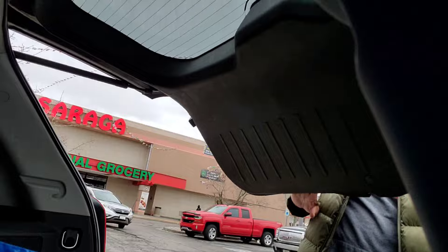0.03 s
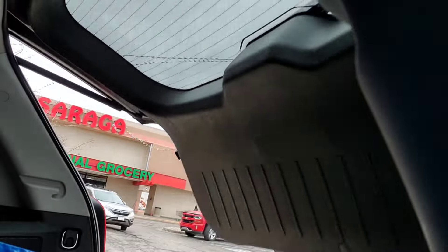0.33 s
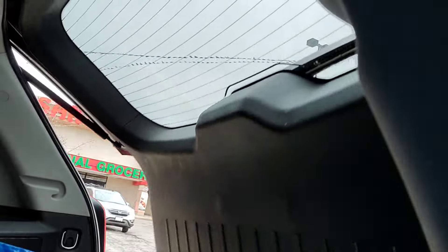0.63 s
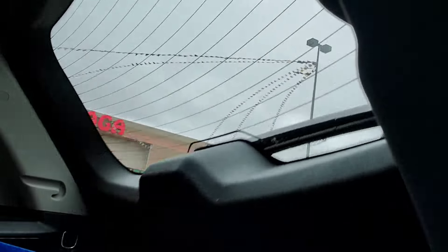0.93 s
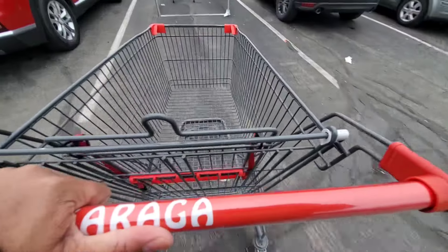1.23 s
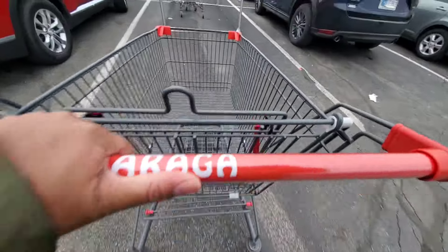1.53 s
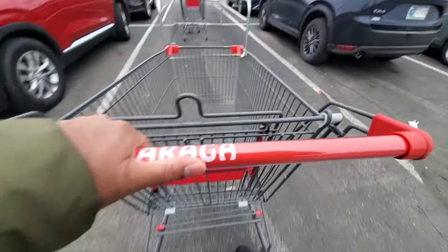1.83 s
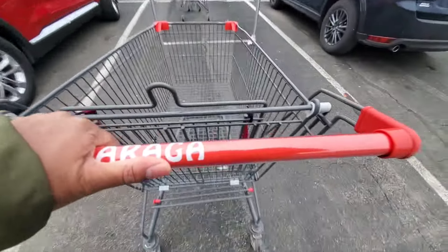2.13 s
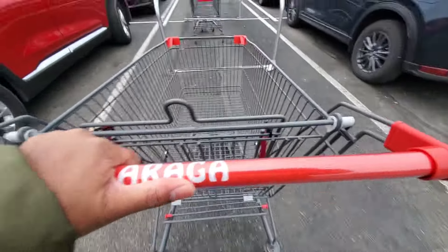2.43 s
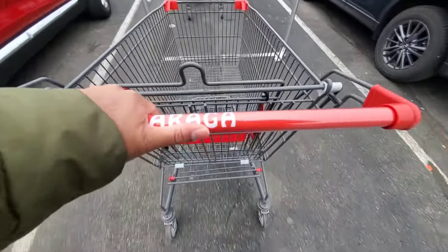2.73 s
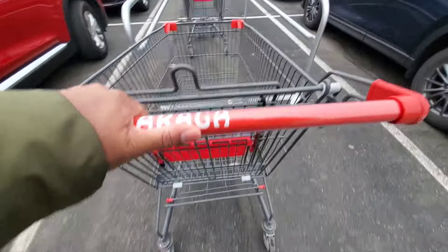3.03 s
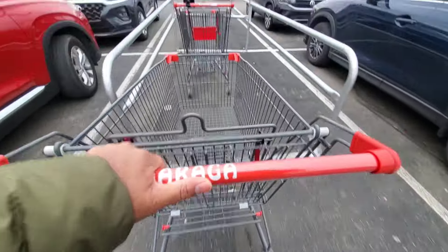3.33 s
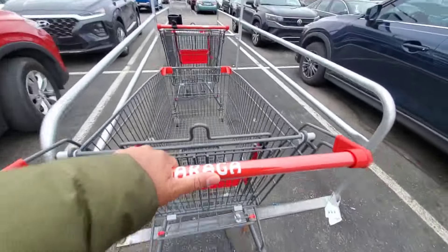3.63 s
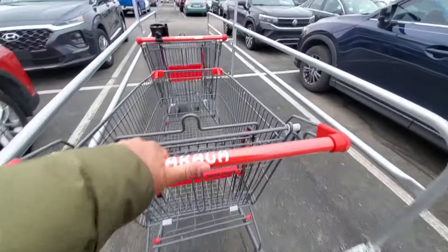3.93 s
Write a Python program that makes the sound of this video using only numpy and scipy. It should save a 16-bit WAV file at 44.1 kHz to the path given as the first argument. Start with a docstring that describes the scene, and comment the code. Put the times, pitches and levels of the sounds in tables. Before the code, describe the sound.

A metal shopping cart clatters across rough asphalt, following a tailgate's soft closing.

```python
"""A low rumble and the swish of a padded jacket, heard from inside a car's boot; the tailgate swings down
with a soft whine and light ticks, and the narrowing gap shuts out the car park. After a short silence
a wire shopping cart is pushed over rough asphalt. The ground forces the wheels to drum, and impacts
at loose joints excite the modes of frame and basket, which chatter and ring. Now and then a wheel
drops into a crack and the whole cart clanks."""
import sys
import numpy as np
from scipy import signal
from scipy.fft import rfft, irfft
from scipy.io import wavfile
from scipy.ndimage import uniform_filter1d

SR = 44100
rng = np.random.default_rng(int(sys.argv[2]) if len(sys.argv) > 2 else 0)


def output_pcm(signal):
    """Save a mono or channel-first signal as 16-bit PCM at the path in sys.argv[1].

    Samples are clipped to [-1, 1] before scaling.
    """
    pcm = np.clip(np.atleast_2d(signal).T, -1, 1) * 32767
    wavfile.write(sys.argv[1], SR, np.round(pcm).astype(np.int16))


N = 176400
TIME = np.arange(N) / SR
SIDES = np.array([[1], [-1]])  # a pan in dB is added on the left and subtracted on the right


def from_db(db):
    """Amplitude ratio of a level in decibels."""
    return 10 ** (np.asarray(db) / 20)


def unit_rms(x):
    """Normalisation to an rms of 1."""
    return x / np.sqrt(np.mean(x ** 2) + 1e-20)


def in_time(rows):
    """Linear interpolation of a table at every sample."""
    return np.interp(TIME, *np.transpose(rows))


def at_hz(rows, hz, column=1):
    """Interpolation of one column on a log-frequency axis."""
    rows = np.array(rows)
    return np.interp(np.log(hz), np.log(rows[:, 0]), rows[:, column])


def bins(size):
    """Frequencies of a discrete spectrum, floored at 1 Hz."""
    return np.maximum(np.arange(size // 2 + 1) * SR / size, 1)


def drift(hz):
    """Random fluctuation: low-passed noise of rms 1."""
    return unit_rms(irfft(rfft(rng.standard_normal(N)) / (1 + (bins(N) / hz) ** 2), N))


def noise(db, correlation=0, size=N):
    """Shaped stereo noise of rms 1; the ratio of mid to side sets the left-right correlation."""
    mid, side = rfft(rng.standard_normal((2, size)))
    correlation = np.clip(correlation, -.99, .99)
    spectrum = np.sqrt(1 + correlation) * mid + np.sqrt(1 - correlation) * side * SIDES
    return unit_rms(irfft(from_db(db) * spectrum, size))


def resonator(impulses, hz, t60):
    """Damped oscillator: a unit impulse starts a decaying sine of amplitude 1."""
    r, w = from_db(-60 / (t60 * SR)), 2 * np.pi * hz / SR
    return signal.lfilter([0, np.sin(w)], [1, -2 * r * np.cos(w), r * r], impulses + 1e-18)


# spectra of the rumble and the outdoor wash: (frequency [Hz], relative level [dB])
RUMBLE_SPECTRUM = [(15, -14), (30, 4), (42, -10), (58, 3.5), (78, -2.5), (100, -1), (135, -19),
                   (200, -20.5), (900, -50), (8000, -91)]
WASH_SPECTRUM = [(250, -7), (650, 2), (1000, -1.5), (1500, -1.5), (3000, -10.5), (6000, -18.5), (9000, -27),
                 (15000, -22.5)]
# envelope of the wash before its treble is shut out: (time [s], level [dB])
WASH_ENVELOPE = [(0, -40), (.3, -38.5), (.6, -40), (.8, -41), (1.17, -48)]
# left-right likeness of both: (frequency [Hz], correlation [-1 to 1])
CAR_CORRELATION = [(60, 1), (180, 0.94), (550, 0.64), (1650, -0.32), (5000, 0.16)]


def car_park(rumble_db=-29, seal_start_s=0.98, seal_hz=3470, seal_db_per_s=34, wash_pan_db=3.5):
    """Transmission through a closing gap: the wash fades, treble fastest, over a steady rumble."""
    hz = bins(N)
    correlation = at_hz(CAR_CORRELATION, hz)
    rumble = from_db(rumble_db + .4 * SIDES) * noise(at_hz(RUMBLE_SPECTRUM, hz), correlation)
    wash = noise(at_hz(WASH_SPECTRUM, hz), correlation)
    muffled = irfft(rfft(wash) / (1 + (hz / seal_hz) ** 2), N)
    gap = from_db(-seal_db_per_s * np.maximum(TIME - seal_start_s, 0))
    transmitted = muffled + gap * (wash - muffled)
    return rumble + from_db(in_time(WASH_ENVELOPE) + wash_pan_db * SIDES) * transmitted


def tailgate_whine(hz=750, db=-49.5, start_s=0.834, rise_s=.03, pan_db=6, waver=0.003):
    """Random modulation: a faint tone wavers in pitch and level as the tailgate ends its travel."""
    phase = 2 * np.pi * np.cumsum(hz * (1 + waver * drift(26))) / SR
    swell = np.clip((TIME - start_s) / rise_s, 0, 1)
    return np.sqrt(2) * np.sin(phase) * swell * from_db(db + pan_db * SIDES + 2.0 * drift(13))


# ticks of the tailgate's trim: (time [s], level [dB])
TRIM_TICKS = [(.090, -33), (.885, -34.5), (.906, -22), (.917, -25.5)]
# their spectrum: (frequency [Hz], relative level [dB])
TICK_SPECTRUM = [(800, -9), (2300, -4.5), (3850, 6), (4800, -5), (8000, -11), (10500, 0), (15000, -1)]


def trim_ticks(t60_s=0.042):
    """Damped transients: each tick of the plastic trim is noise that decays exponentially."""
    envelope = sum((TIME >= s) * from_db(db - 60 * np.abs(TIME - s) / t60_s) for s, db in TRIM_TICKS)
    return envelope * noise(at_hz(TICK_SPECTRUM, bins(N)))


# strokes of the jacket: (peak time [s], rise [s], fall [s], level [dB], tilt [dB/octave])
STROKES = [(.03, 0.11, 0.086, -38, -1), (.362, 0.053, 0.05, -30, .8), (.455, 0.037, 0.033, -33, 0.5),
           (0.558, 0.019, 0.03, -34, -2.5), (0.606, 0.003, 0.026, -31.5, 0), (.69, 0.05, .036, -37, .6),
           (0.916, 0.013, 0.021, -36.5, 3)]
# spectrum of sliding nylon: (frequency [Hz], relative level [dB])
NYLON_SPECTRUM = [(300, -19), (700, -4), (1500, 0.5), (3000, 2), (4300, -5), (6600, -3), (8000, -12.5),
                  (12000, -8), (15500, -9)]


def jacket(pan_db=0.5, pan_db_per_octave=-2, grain_db=1.3):
    """Friction noise: nylon slides on nylon in soft, slightly grainy swells."""
    out, hz = 0, bins(N)
    octaves = np.log2(np.maximum(hz, 500) / 4000)
    spectrum = at_hz(NYLON_SPECTRUM, hz) + SIDES * (pan_db + pan_db_per_octave * octaves)
    for s, rise, fall, db, tilt in STROKES:
        width = np.where(TIME < s, rise, fall)
        swell_db = -4.04 * ((TIME - s) / width) ** 2  # Gaussian envelope
        out = out + from_db(db + swell_db) * noise(spectrum + tilt * octaves)
    return out * from_db(grain_db * drift(90))


# envelope of the wheels' drumming: (time [s], relative level [dB])
DRUM_ENVELOPE = [(1.28, -30), (1.5, -32), (1.58, -37), (1.9, -37), (2.1, -33), (2.3, -36), (3.2, -34.5),
                 (3.5, -39), (3.99, -39.5)]
# spectra of the drumming and the grinding treads: (frequency [Hz], relative level [dB])
DRUM_SPECTRUM = [(20, -19), (40, -4.5), (70, 2.5), (110, -2.5), (160, -9), (230, -20.5), (450, -35)]
TREAD_SPECTRUM = [(100, -8.5), (280, 1.5), (450, -10), (750, -3.5), (1100, -12.5), (2500, -36)]
# left-right likeness of the cart: (frequency [Hz], correlation [0 to 1])
CART_CORRELATION = [(60, 0.13), (120, 0.33), (240, 0.99), (480, 0.78), (950, 0.41), (1900, 0.0041)]


def wheels(drum_gain_db=3.0, tread_db=-36.5, pan_db=1.5, flutter_db=1.7):
    """Roughness excitation: hard wheels drum unevenly on asphalt while their treads grind on grit."""
    hz = bins(N)
    correlation = at_hz(CART_CORRELATION, hz)
    drum = noise(at_hz(DRUM_SPECTRUM, hz), correlation) * from_db(in_time(DRUM_ENVELOPE) + drum_gain_db)
    grind = noise(at_hz(TREAD_SPECTRUM, hz), correlation) * from_db(tread_db)
    return (drum + grind) * from_db(pan_db * SIDES + flutter_db * drift(15))


# a wheel drops into a dip: (time [s], left level [dB])
DIPS = [(1.345, -20), (1.394, -20), (1.491, -16), (2.066, -17), (2.736, -15), (2.909, -19), (3.18, -19)]


def frame_booms(left_hz=89.5, t60_s=0.11):
    """Impulse response: each dip makes the frame boom briefly, lower and softer on the right."""
    impulses = np.zeros(N)
    for s, db in DIPS:
        impulses[int(s * SR)] = from_db(db)
    left = resonator(impulses, left_hz, t60_s)
    right = 0.34 * resonator(impulses, 0.67 * left_hz, t60_s)
    return np.array([left, right])


# resonances of the cart: (frequency [Hz], left gain [dB], right gain [dB])
BASKET_RESPONSE = [(285, -8, -11), (417, -15, -16), (790, -12.5, -12.5), (926, -16.5, -16), (1384, -5, -7),
                   (1790, -7, -11), (2490, -2, -1), (2980, -8.5, -2.5), (3140, -6.5, -12), (4020, -8, -1.5),
                   (4780, -16, -6.5), (5140, -7, -2.5), (6960, -13, -9), (7500, -23.5, -12),
                   (10030, -23, -16.5), (11460, -15.5, -6.5), (13050, -23.5, -17.5), (14100, -20.5, -13.5),
                   (15560, -9, -25)]


def basket_db(hz):
    """Frequency response of the cart on each side, with a bass roll-off below 480 Hz."""
    response = np.array([at_hz(BASKET_RESPONSE, hz, column) for column in (1, 2)])
    return response - 10 * np.log10(1 + (480 / hz) ** 4)


def contacts(per_s):
    """Poisson process: metal touches metal at random times, with slightly uneven strength."""
    strengths = from_db(-0.5 * np.minimum(rng.exponential(1, N), 3.2))
    return (rng.random(N) < per_s / SR) * strengths * rng.choice([-1, 1], N)


def loose_joints(shake, hits_per_s, band_hz, joints=6, mode_spacing_hz=59.95):
    """Convolution: every contact gives a short crack and a ring of that joint's own scattered modes."""
    crack_t60_s, ring_t60_s, ring_gain_db = 0.017, 0.23, 2
    size = SR // 3
    out, hz, t = 0, bins(size), TIME[:size]
    low_hz, high_hz = band_hz
    spectrum = basket_db(hz) - 10 * np.log10((1 + (low_hz / hz) ** 16) * (1 + (hz / high_hz) ** 16))
    correlation = at_hz(CART_CORRELATION, hz)
    for _ in range(joints):
        is_mode = (rng.random(len(hz)) < SR / size / mode_spacing_hz) & (hz > 1100)
        modes_db = np.where(is_mode, rng.uniform(-3, 3, (2, len(hz))), -80)
        crack = unit_rms(noise(spectrum, correlation, size) * from_db(-60 * t / crack_t60_s))
        ring = unit_rms(noise(spectrum + modes_db, correlation, size) * from_db(-60 * t / ring_t60_s))
        response = crack + from_db(ring_gain_db) * ring
        out = out + signal.fftconvolve(contacts(hits_per_s / joints)[None], response, axes=1)[:, :N]
    running_rms = np.sqrt(uniform_filter1d(np.mean(out ** 2, axis=0), size=SR // 25) + 1e-9)
    return out / running_rms * from_db(in_time(shake))


# how hard each part of the cart is shaken: (time [s], relative level [dB])
FRAME_ENVELOPE = [(1.28, -24), (1.38, -27), (1.64, -25.5), (1.67, -22.5), (1.71, -27), (1.76, -25),
                  (1.94, -25), (2.05, -27), (2.09, -24), (2.19, -27.5), (2.4, -25.5), (2.78, -24),
                  (2.98, -24), (3.17, -27.5), (3.23, -23), (3.3, -27.5), (3.36, -23), (3.58, -28.5),
                  (3.59, -24.5), (3.87, -24.5), (3.99, -28)]
WIRE_ENVELOPE = [(1.28, -25.5), (1.43, -29.5), (1.65, -25.5), (1.67, -22.5), (1.9, -23), (2.09, -26),
                 (2.15, -28), (2.48, -23), (2.52, -25.5), (2.94, -23), (3.13, -27), (3.25, -23.5),
                 (3.4, -23.5), (3.58, -26.5), (3.59, -22), (3.82, -24.5), (3.87, -22), (3.99, -27.5)]
JINGLE_ENVELOPE = [(1.28, -27.5), (1.4, -33), (1.7, -28), (1.87, -26.5), (1.95, -23), (1.98, -28.5),
                   (2.2, -31), (2.25, -28), (2.37, -30), (2.49, -25.5), (2.55, -29), (2.95, -26),
                   (3.1, -30), (3.38, -24), (3.45, -31), (3.52, -26), (3.6, -31), (3.63, -26), (3.87, -25),
                   (3.95, -29.5)]


def chatter(flicker_db=0.5, flicker_hz=23.5):
    """Base excitation: the ground jostles heavy bars, thinner wires and the finest jingling parts."""
    frame = from_db(2.5) * loose_joints(FRAME_ENVELOPE, hits_per_s=420, band_hz=(220, 3240))
    wires = from_db(3) * loose_joints(WIRE_ENVELOPE, hits_per_s=600, band_hz=(3040, 7350))
    jingle = from_db(4) * loose_joints(JINGLE_ENVELOPE, hits_per_s=650, band_hz=(8360, 16900))
    return (frame + wires + jingle) * from_db(flicker_db * drift(flicker_hz))


def pings(per_s=240, gain_db=4, t60_s=0.073, spread_db=5, tilt_db_per_octave=2.6):
    """Free vibration: wires flick against each other, each ringing briefly at its natural frequency."""
    size = SR // 8
    out, t = np.zeros((2, N + size)), TIME[:size]
    shakes = np.array([in_time(FRAME_ENVELOPE), in_time(WIRE_ENVELOPE), in_time(JINGLE_ENVELOPE)])
    decay = from_db(-60 * t / t60_s)
    starts = np.flatnonzero(rng.random(N) < per_s / SR)
    for start, (pitch, strength, *phases) in zip(starts, rng.random((N, 4))[starts]):
        hz = 1250 * 10 ** pitch
        part = np.searchsorted([3200, 8000], hz)  # frame, wire or jingle band
        colour_db = basket_db(hz) + tilt_db_per_octave * np.log2(hz / 2500)
        db = shakes[part, start] + gain_db + colour_db + spread_db * (2 * strength - 1)
        tone = np.sin(2 * np.pi * (hz * t + np.array(phases)[:, None]))
        out[:, start:start + size] += from_db(db)[:, None] * decay * tone
    return out[:, :N]


# wires that ring out clearly: (frequency [Hz], relative level [dB])
WIRE_RESONANCES = [(1610, -39), (2390, -46), (3542, -37), (5728, -37), (8559, -44), (10734, -41),
                   (11612, -41)]


def ringing_wires(hits_per_s=49, t60_s=0.082, gain_db=-2.0, pan_db=-3.4):
    """Resonance under repeated impact: single wires sing through the rattle."""
    out = np.zeros((2, N))
    for hz, db in WIRE_RESONANCES:
        hits = (rng.random((2, N)) < hits_per_s / SR) * rng.standard_normal(N)
        out += from_db(db + gain_db) * unit_rms(resonator(hits, hz, t60_s))
    shake_db = in_time(WIRE_ENVELOPE) - np.mean(np.array(WIRE_ENVELOPE)[:, 1])
    return out * from_db(shake_db + pan_db * SIDES)


# bright clinks above the jingle: (time [s], frequency [Hz], relative level [dB])
WIRE_SLAPS = [(1.520, 13650, -12), (1.731, 6800, -14), (1.890, 11600, -16), (1.922, 10750, -16),
              (2.130, 13650, -19), (2.240, 7650, -15), (2.399, 8550, -18), (2.465, 11600, -15),
              (2.912, 8600, -12.5), (3.255, 11450, -15), (3.862, 10450, -15)]


def clinks(t60_s=.16, max_split_hz=110, bounce_s=.011, bounce_loss_db=3):
    """Beating: a loose wire slaps its neighbour, bounces, and rings in two close modes."""
    size = SR // 3
    out, t = np.zeros((2, N + SR)), TIME[:size]
    for s, hz, db in WIRE_SLAPS:
        for bounce in range(3):
            start = int((s + bounce * bounce_s) * SR)
            modes = (hz, hz + max_split_hz * rng.random())
            pair = sum(np.sin(2 * np.pi * (mode * t + rng.random((2, 1)))) for mode in modes)
            onset_db = db - bounce * bounce_loss_db + basket_db(hz)[:, None]
            out[:, start:start + size] += pair * from_db(onset_db - 60 * t / t60_s)
    return out[:, :N]


# a wheel meets a crack: (time [s], clank level [dB], clank centre [Hz], thud level [dB])
CRACKS = [(1.660, -17, 1300, -27), (1.678, -21, 4000, -20), (2.081, -14.5, 2400, -29),
          (2.092, -21, 2000, -19.5), (2.135, -16, 2400, -40), (2.690, -18, 1400, -36),
          (2.745, -14, 1500, -27), (2.914, -16, 2400, -34), (2.980, -20, 1500, -41),
          (3.228, -15.5, 1450, -32), (3.588, -8, 3100, -24), (3.600, -16.5, 1050, -26),
          (3.628, -14, 1290, -25), (3.660, -26, 2000, -19.5), (3.704, -8.5, 1250, -20.5),
          (3.778, -13.5, 2800, -39)]


def jolts(clank_t60_s=0.065, clank_octaves=0.85, thud_t60_s=0.035, thud_hz=255, attack_s=0.0017):
    """Shock excitation: a crack in the asphalt gives a dull wheel thud and a clank of the whole frame."""
    size = SR // 3
    out, hz, t = np.zeros((2, N + SR)), bins(size), TIME[:size]
    thud_spectrum = -2.1 * np.log2(hz / thud_hz) ** 2
    for s, clank_db, centre_hz, thud_db in CRACKS:
        clank_spectrum = basket_db(hz) - 4 * (np.log2(hz / centre_hz) / clank_octaves) ** 2
        clank = noise(clank_spectrum, size=size) * from_db(clank_db - 60 * t / clank_t60_s)
        thud = noise(thud_spectrum, correlation=0.45, size=size) * from_db(thud_db - 60 * t / thud_t60_s)
        start = int(s * SR)
        out[:, start:start + size] += (clank + thud) * np.minimum(t / attack_s, 1)
    return out[:, :N]


def scene(car_end_s=1.174, cart_start_s=1.267):
    """Superposition of sources in two scenes: the car, an abrupt moment of silence, then the cart."""
    car = car_park() + jacket() + tailgate_whine() + trim_ticks()
    cart = chatter() + ringing_wires() + pings() + clinks() + jolts() + wheels() + frame_booms()
    cart_fade_in = np.clip((TIME - cart_start_s) / .005, 0, 1)
    return (TIME < car_end_s) * car + cart_fade_in * cart


def record(dry):
    """Soft saturation rounds the highest peaks; a steep low-pass cuts the top above 15.8 kHz."""
    lowpass = signal.ellip(12, .1, 80, 15800, fs=SR, output="sos")
    return signal.sosfilt(lowpass, 1.367 * np.tanh(dry / 1.433))


dry = scene()
out = record(dry)
output_pcm(out)
```